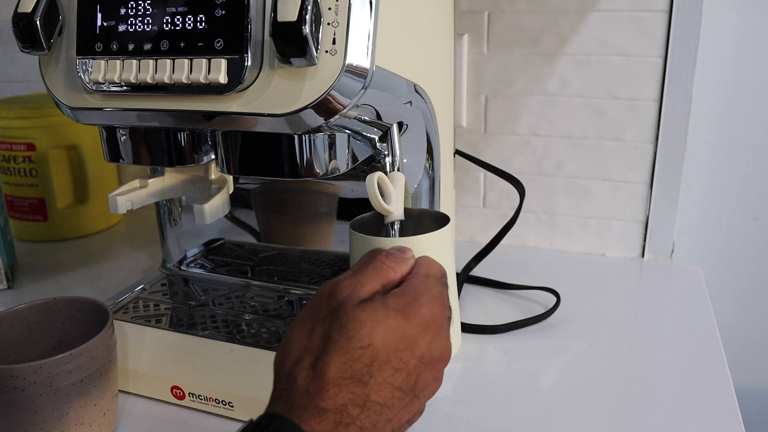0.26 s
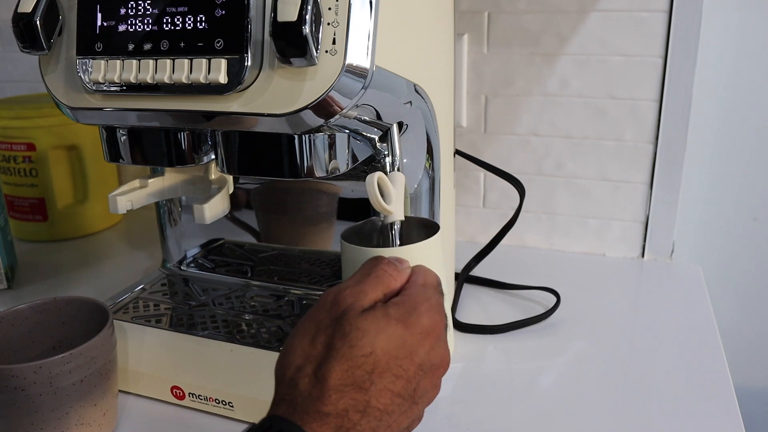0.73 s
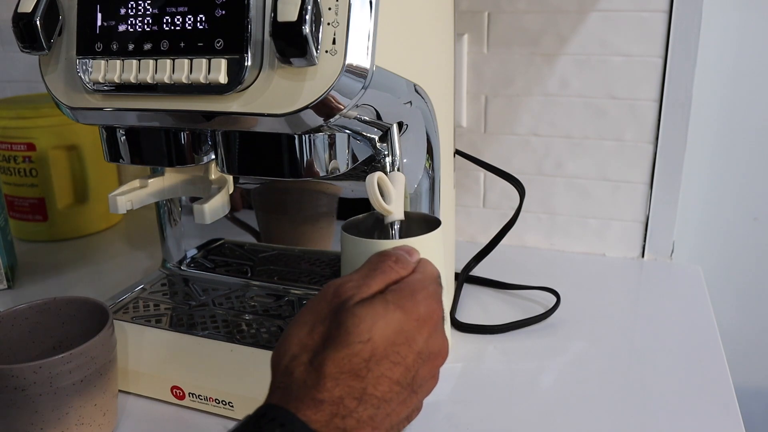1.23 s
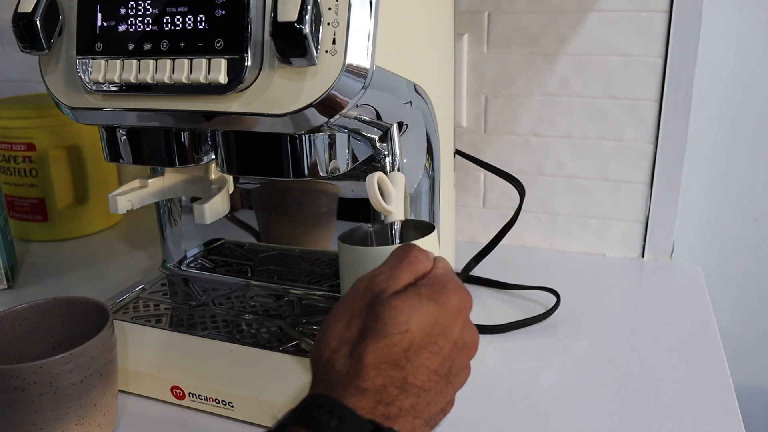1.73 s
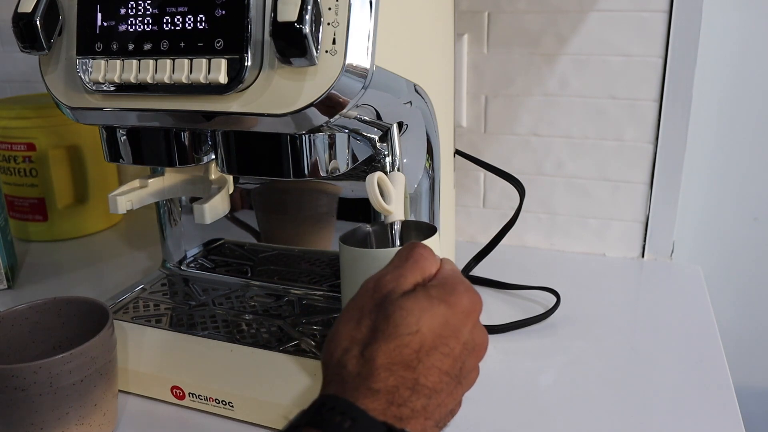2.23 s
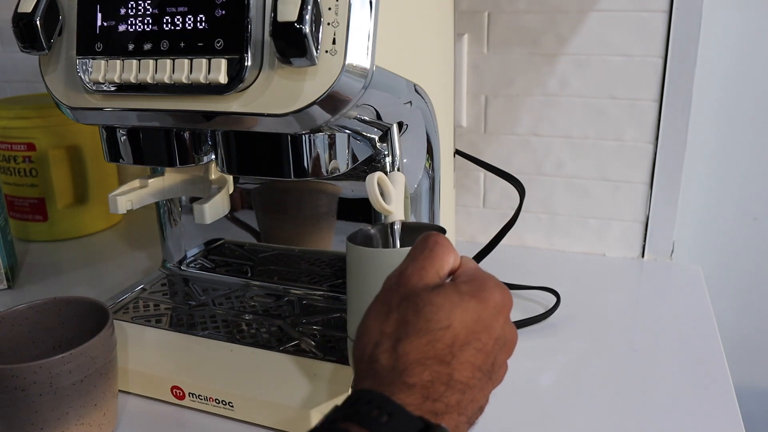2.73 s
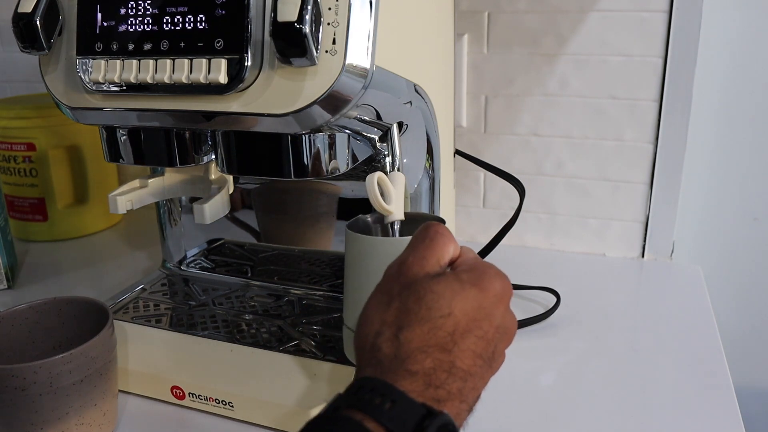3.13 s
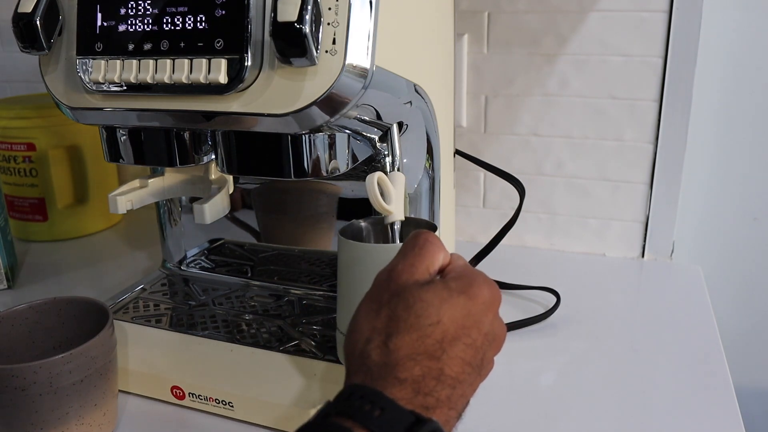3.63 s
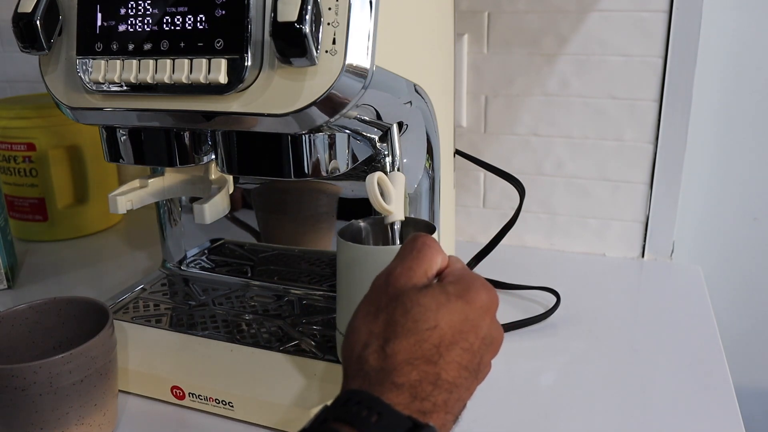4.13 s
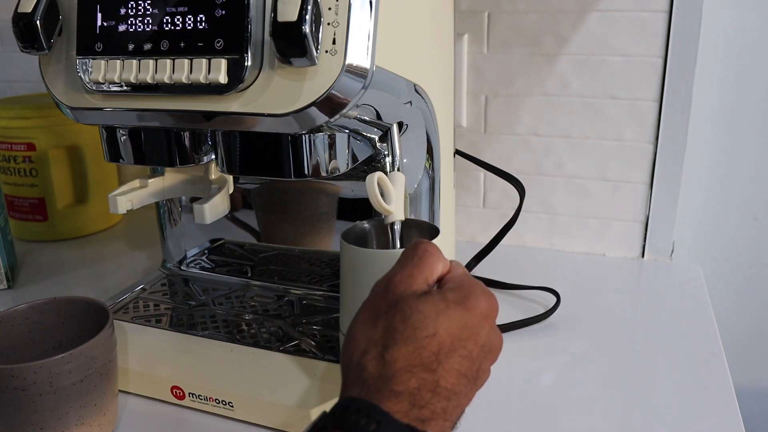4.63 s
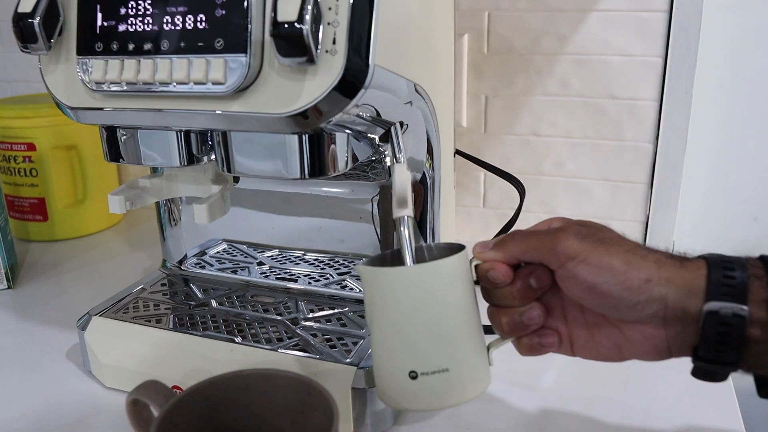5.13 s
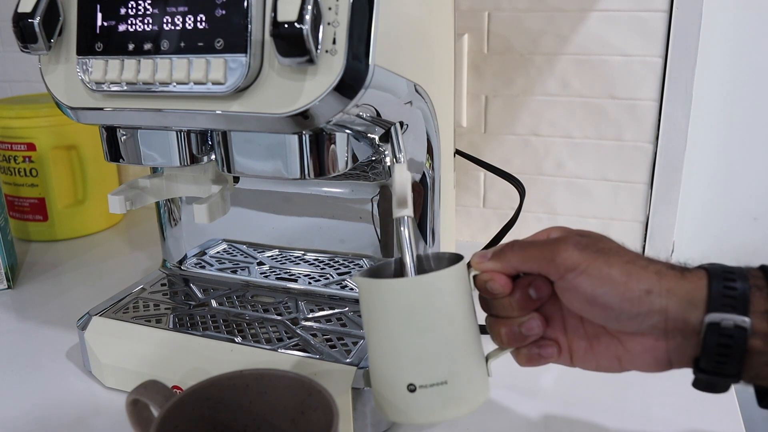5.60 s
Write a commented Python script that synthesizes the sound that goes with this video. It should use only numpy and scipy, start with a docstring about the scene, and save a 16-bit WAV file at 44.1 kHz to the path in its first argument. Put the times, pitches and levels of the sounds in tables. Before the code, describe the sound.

Close up in a kitchen, a steam jet sputters and hisses in milk inside a steel pitcher, with a hopping squeal. A high screech grows steady, then turns ragged and lower. At about five seconds it cuts abruptly to a soft hiss, with quick metallic knocks and a brief rattling scrape against the wand. The same in both channels.

```python
"""A steam wand in milk inside a steel pitcher, heard close in a kitchen, the same in both channels.
First noise bands sputter and hiss, grains ring wall and air, and a low squeal hops in pitch.
Then the jet screeches: tones of wandering strength and phase, with rough overtones, and spits of noise.
At 5.07 s the scene cuts from the jet to soft coloured noise; chattering contacts knock the pitcher on the wand.
Last, slip-driven grains and noise rattle and scrape along it. Rumble and thrum lie below, late a faint hoot."""
import sys
import numpy as np
from scipy import signal
from scipy.fft import rfft, irfft, next_fast_len
from scipy.io import wavfile

SR = 44100
rng = np.random.default_rng(int(sys.argv[2]) if len(sys.argv) > 2 else 0)


def bounce(signal):
    """Save signal as a 16-bit WAV file at the path given by the first command-line argument."""
    frames = np.transpose(np.atleast_2d(signal))
    limited = np.clip(frames, -1, 1)
    pcm = np.round(limited * 32767).astype(np.int16)
    wavfile.write(sys.argv[1], SR, pcm)


N = 258470

# Levels are before gusts, echoes and mix gain. Pairs are for a (ragged, steady) jet.
# Jet screech. Each row: time in seconds, pitch in Hz, level in dB, steadiness 0-1, octave level in dB.
SCREECH = [(.25, 4770, -50, 0.28, -50), (.46, 4805, -31.5, .4, -44), (.78, 4760, -25, .4, -47),
           (.86, 5000, -30, .4, -45), (1.04, 4960, -27, 0.29, -34), (1.07, 4650, -24, .0, -39),
           (1.5, 4790, -22.5, 0.09, -34), (1.66, 4900, -23, .4, -30), (1.9, 5089, -24, 0.67, -38),
           (2.25, 5113, -21.5, 0.93, -32), (2.96, 5137, -22.5, 0.96, -33), (3.2, 5037, -22, 0.96, -31),
           (3.5, 4945, -23, 0.93, -26), (3.86, 4900, -28, .8, -32), (4.02, 4800, -29, .5, -36),
           (4.12, 4470, -25.5, .2, -32), (4.38, 4540, -30.5, .15, -36), (4.6, 4490, -28, .2, -34),
           (5.07, 4370, -30.5, .2, -35)]
# Overtones besides the octave. Each row: multiple of the pitch, relative level in dB.
OVERTONES = [(1.5, 2), (2.5, 2), (3, -2)]
# Lower squeal of the steam pocket, later near half the pitch. Each row: time in seconds, pitch in Hz, level in dB.
SQUEAL = [(0, 2880, -25.5), (.08, 2850, -24.5), (.15, 2450, -28.5), (.3, 2370, -19), (.42, 2150, -26.5),
          (.48, 3200, -42), (.7, 3300, -21), (.85, 3200, -35), (.87, 2900, -25), (1.16, 2680, -26.5),
          (1.5, 2703, -25.5), (1.95, 2781, -28), (2.05, 2561, -31.5), (2.3, 2643, -27), (2.95, 2625, -26.5),
          (3.22, 2520, -27.5), (3.75, 2420, -31), (4.05, 2373, -32), (4.4, 2285, -41), (5.07, 2203, -48)]
SCREECH_WANDER_PER_S, SQUEAL_WANDER_PER_S = (290, 60), (300, 48)
OVERTONES_DB, SKIRT_DB = (-22, -14), (-6, -11)   # against the screech
# Pitcher wall modes. Each row: frequency in Hz, width in Hz, relative level in dB.
WALL_MODES = [(2920, 35, 6), (3360, 49, -4), (3740, 90, -9), (4150, 33, 2.5), (4437, 56, -14.5),
              (4650, 12.2, -5), (4900, 9.6, -12)]

# Steam in the milk. Each row: time in seconds, churning in dB, wall ringing in dB, air column in dB.
STEAM = [(0, -26, -36, -26.5), (.3, -26.5, -29, -23.5), (.45, -24, -27.5, -30), (.6, -23.5, -29, -29.5),
         (.76, -24, -26.5, -42), (1.15, -32, -26, -49.5), (1.35, -37, -33, -43.5), (1.9, -37, -41, -51.5),
         (3.3, -44.5, -45, -46), (3.8, -47, -39, -46.5), (4.15, -37, -28, -44), (4.6, -33.5, -34, -45),
         (4.9, -30, -37, -40), (5.07, -33.5, -32, -39)]
# Sputter spectrum. Each row: frequency in Hz, relative density in dB per Hz.
SPUTTER_SPECTRUM = [(410, -62), (700, -28), (926, -1.5), (1180, -17), (1410, -4.5), (2330, 3), (3780, -4),
                    (3960, -36), (4760, 3), (6000, -5.5), (7000, -7), (9100, -103), (15400, -120)]
# Jet hiss spectrum. Each row: frequency in Hz, relative density in dB per Hz.
HISS_SPECTRUM = [(900, -43.5), (1500, -21.5), (2250, -12.5), (2900, -6), (3200, -17), (3950, -16),
                 (4500, -7), (5300, -8.5), (5900, -22), (6600, -15), (8400, -11.5), (10500, -10),
                 (13800, -17.5), (16000, -12)]
# Jet hiss. Each row: time in seconds, level in dB, top treble against the rest in dB.
HISS_LEVEL = [(0, -28.5, 3), (.5, -25.5, -3), (.9, -28.5, -2), (1.55, -27.5, 0.5), (1.75, -28.5, 0.5),
              (2.8, -31, 0.5), (3.6, -26.5, 0.5), (3.85, -24, -1), (4.2, -22.5, -3), (5.07, -27, -5)]
TOP_TREBLE_HZ = 12000
GAP_HZ, GAP_WIDTH_HZ, GAP_DEPTH = 5950, 1380, (.1, 0.7)   # quiet gap in the hiss above the pitch
AIR_COLUMN_HZ, AIR_COLUMN_WIDTHS_HZ = 932, (60, 156)   # two resonances in series
# Air overtone modes. Each row: frequency in Hz, width in Hz, relative level in dB.
AIR_OVERTONE_MODES = [(1500, 51, 1.5), (1276, 150, -4), (1840, 400, -11.5)]
AIR_OVERTONE_DB, AIR_OVERTONE_DB_PER_S = -6, 3   # against the air column; it gains as the froth rises
# Spits of steam in the treble. Each row: time in seconds, peak gain in dB ahead of the band-pass.
SPITS = [(.54, -19), (.725, -23), (1.195, -26), (1.29, -31), (1.56, -17), (3.815, -18)]
SPIT_S, SPIT_BAND_HZ = .009, (7000, 13000)

CUT_S, CUT_FADE_S = 5.072, 0.0082
# Soft hiss spectrum. Each row: frequency in Hz, relative density in dB per Hz.
SOFT_HISS_SPECTRUM = [(400, -38), (600, -38), (1000, -22), (1250, -17), (1800, -21), (2350, -22),
                      (2550, -7.5), (3000, -7.5), (3270, -1.5), (3600, -11.5), (4300, -16.5), (5100, -9.5),
                      (7700, -16), (11000, -11.5), (13500, -23), (16000, -13)]
SOFT_HISS_DB, SOFT_HISS_DB_PER_S = -29, -3.5

# Knocks. Each row: time in seconds, peak in dB, pitch in Hz, length in seconds.
KNOCKS = [(5.1406, -20.5, 3080, 0.012), (5.2972, -6, 3470, 0.01), (5.304, -7.5, 3050, 0.014),
          (5.319, -7.5, 1990, 0.007), (5.3274, -16, 2050, 0.0094), (5.394, -13.5, 3480, 0.015),
          (5.396, -17, 2270, 0.0072), (5.444, -24, 3260, 0.0086), (5.669, -12, 1760, 0.0076),
          (5.753, -12, 3166, 0.014)]
# Pitcher modes when knocked. Each row: frequency in Hz, width in Hz, relative level in dB.
KNOCK_MODES = [(1387, 105, 1), (1670, 220, 2), (2645, 97, -1.5), (3110, 93, -27.5), (3770, 81, -21),
               (4500, 200, -14.5), (4930, 170, -11), (6600, 270, -31)]
# Drag along the wand. Each row: time in seconds, rattle in dB, thud in dB, scrape in dB.
DRAG = [(5.655, -84, -58, -42.5), (5.669, -22, -53, -16.5), (5.767, -32, -57, -21),
        (5.805, -21.5, -29.5, -13.5), (5.843, -23, -31, -16.5), (5.86, -22, -44, -31)]
# Rattle modes. Each row: frequency in Hz, width in Hz, relative level in dB.
RATTLE_MODES = [(1383, 135, 3.5), (1772, 250, -7.5), (1000, 70, -16), (6500, 220, -17)]
# Thud modes. Each row: frequency in Hz, width in Hz, relative level in dB.
THUD_MODES = [(280, 50, 3.5), (466, 105, -8)]
# Scrape spectrum. Each row: frequency in Hz, relative density in dB per Hz.
SCRAPE_SPECTRUM = [(1180, -42), (2000, -11), (2640, -39), (3090, -11), (5390, -7), (6250, -1.5),
                   (6940, -16.5), (9660, -2), (14900, -5.5), (16000, 3.5)]

# Kitchen rumble. One row: floor in dB, first swell in dB, its decay in seconds, second in dB, its decay in seconds.
RUMBLE = (-68.5, -44, .16, -50.5, 1)
# Rumble spectrum. Each row: frequency in Hz, relative density in dB per Hz.
RUMBLE_SPECTRUM = [(12, -43), (20, -21.5), (54, -7), (136, -10.5), (206, -2), (263, -8), (387, -5),
                   (438, -1), (625, -11.5), (800, -7.5), (1040, -37.5), (1760, -120)]
# Machine thrum. One row: floor in dB, first swell in dB, its decay in seconds, second in dB, its decay in seconds.
THRUM = (-77.5, -43, 0.04, -54, 0.01)
THRUM_HZ, THRUM_WIDTH_HZ = 58, 29
LOW_SWELL_S, LOW_RISE_S = 4.965, 0.021   # second swell of rumble and thrum
# Faint low hoot. Each row: time in seconds, level in dB.
HOOT = [(5.36, -71), (5.444, -58.5), (5.758, -48), (5.8, -41)]
HOOT_HZ = 458

ECHO_T60_S, ECHO_DB = 0.051, -4   # off the machine and counter
KITCHEN_T60_S, KITCHEN_DB = 0.78, -9.5
CUTOFF_HZ = 15750


def screech(gust):
    """An unsteady jet tone with overtones that blur the more the higher they lie, over a lower squeal."""
    hz, top_db, steady, octave_db = in_time(SCREECH)
    squeal_hz, squeal_db = in_time(SQUEAL)
    top_per_s = between(SCREECH_WANDER_PER_S, steady)
    squeal_per_s = between(SQUEAL_WANDER_PER_S, steady)
    hz = hz + 25 * drift(7.73)

    high = np.zeros(N)
    for k, db in OVERTONES:
        high += from_db(db + 1.33 * drift(11.0)) * blurred_tone(k * hz, 1.5 * k * top_per_s)
    high *= from_db(top_db + between(OVERTONES_DB, steady))
    octave = from_db(octave_db + 1.5 * drift(5.5)) * blurred_tone(2 * hz, 2.6 * top_per_s)

    tone = from_db(top_db + 1.0 * drift(3.9)) * blurred_tone(hz, top_per_s)
    squeal = from_db(squeal_db) * blurred_tone(squeal_hz, squeal_per_s)
    skirt_db = top_db + between(SKIRT_DB, steady)
    skirt = from_db(skirt_db) * blurred_tone(.92 * hz, np.full(N, 330.))   # breathy, under the pitch
    low = tone + squeal + skirt
    low = low + from_db(-0.5) * body(low, WALL_MODES)   # the wall rings along
    return (low + octave + high) * from_db(0.46 * gust)


def steam(gust):
    """Collapsing bubbles sputter and the jet hisses as noise; random grains ring the wall and the air."""
    churn_db, wall_db, air_db = in_time(STEAM)
    hiss_db, treble_db = in_time(HISS_LEVEL)
    steady = in_time(SCREECH)[2]

    sputter = from_db(churn_db) * coloured(SPUTTER_SPECTRUM, 1.0, 1.0 * gust, 5.7, count=12)
    hiss = from_db(hiss_db) * coloured(HISS_SPECTRUM, 3.0, 0.68 * gust, 7.6, count=26)
    high_pass = signal.butter(2, TOP_TREBLE_HZ, "high", fs=SR, output="sos")
    treble = signal.sosfiltfilt(high_pass, hiss)
    noise = sputter + hiss + (from_db(treble_db) - 1) * treble
    noise = noise - between(GAP_DEPTH, steady) * resonate(noise, GAP_HZ, GAP_WIDTH_HZ)

    wall = from_db(wall_db + 1.6 * drift(3.4)) * rms_one(body(grains(4000, 1.2), WALL_MODES))
    air = grains(3000, 2.9)
    for width_hz in AIR_COLUMN_WIDTHS_HZ:
        air = resonate(air, AIR_COLUMN_HZ, width_hz)
    overtone = resonate(body(grains(3000, 1.6), AIR_OVERTONE_MODES), 1530, 520)
    overtone_db = air_db + AIR_OVERTONE_DB + AIR_OVERTONE_DB_PER_S * np.arange(N) / SR
    air_sound = from_db(air_db) * rms_one(air) + from_db(overtone_db) * rms_one(overtone)
    return noise + spits() + wall + air_sound


def spits():
    """Short bright bursts: band-passed noise under Gaussian envelopes."""
    t = np.arange(N) / SR
    envelope = sum(from_db(db) * np.exp(-((t - s) / SPIT_S) ** 2) for s, db in SPITS)
    band_pass = signal.butter(3, SPIT_BAND_HZ, "band", fs=SR, output="sos")
    return envelope * signal.sosfilt(band_pass, rng.standard_normal(N))


def soft_hiss(gust, since_cut_s):
    """Soft flickering coloured noise whose level falls steadily after the cut."""
    level_db = SOFT_HISS_DB + SOFT_HISS_DB_PER_S * np.maximum(since_cut_s, 0)
    return from_db(level_db) * coloured(SOFT_HISS_SPECTRUM, 2.1, 0.25 * gust, 23.0, count=20)


def knocks():
    """Each knock is a short chatter of contacts into the damped pitcher, tinted at a pitch of its own."""
    t, out = np.arange(N) / SR, np.zeros(N)
    for s, peak_db, hz, length_s in KNOCKS:
        at = slice(round(s * SR) - 90, round(s * SR) + 3000)
        since = np.maximum(t[at] - s + 0.002, 0) / max(length_s, .002)   # in lengths, from 2 ms early
        envelope = np.minimum(4 * since, 1) * np.exp(-since ** 2)
        chatter = rng.choice([-1., 1.], len(since)) * envelope
        knock = body(chatter, KNOCK_MODES) + 1.52 * resonate(chatter, hz, 286)
        out[at] += from_db(peak_db) * knock / np.abs(knock).max()
    return out


def drag():
    """Uneven slips scale grains into rattle and thud modes, and a coloured scrape noise."""
    rattle_db, thud_db, scrape_db = in_time(DRAG)
    slips = from_db(2.1 * drift(78))
    rattle = from_db(rattle_db) * rms_one(body(slips * grains(4000, 3.5), RATTLE_MODES))
    thud = from_db(thud_db) * rms_one(body(slips * grains(1200, 2.7), THUD_MODES))
    scrape = from_db(scrape_db) * slips * coloured(SCRAPE_SPECTRUM, 0.43, 0, 12, count=10)
    started = np.arange(N) > DRAG[0][0] * SR
    return started * (rattle + thud + scrape)


def hoot():
    """A faint low tone, slowly wandering in strength and phase."""
    started = np.arange(N) > HOOT[0][0] * SR
    return started * from_db(in_time(HOOT)[0]) * blurred_tone(np.full(N, HOOT_HZ), np.full(N, 12.))


def rumble():
    """Kitchen rumble: low coloured noise with two swells."""
    return swells(*RUMBLE) * coloured(RUMBLE_SPECTRUM, 0.38, 0, 6.4, count=5)


def thrum():
    """Low thrum of the machine: noise through one broad resonance, with two swells."""
    return swells(*THRUM) * rms_one(resonate(rng.standard_normal(N), THRUM_HZ, THRUM_WIDTH_HZ))


def swells(floor_db, first_db, first_s, second_db, second_s):
    """Gain of a floor with two dying swells, at the start and at LOW_SWELL_S."""
    t = np.arange(N) / SR
    since = np.maximum(t - LOW_SWELL_S, 0)
    first = from_db(first_db) * np.exp(-t / first_s)
    second = from_db(second_db) * np.minimum(since / LOW_RISE_S, 1) * np.exp(-since / second_s)
    return from_db(floor_db) + first + second


def echoes(x, t60_s, level_db):
    """Dense reflections: a dying noise as impulse response."""
    t = np.arange(SR // 2) / SR
    tail = rng.standard_normal(len(t)) * from_db(-60 * t / t60_s)
    high_pass = signal.butter(2, 1100, "high", fs=SR, output="sos")   # reflections leave the low tones even
    tail = signal.sosfilt(high_pass, tail)
    tail /= np.sqrt(np.sum(tail ** 2))
    return x + from_db(level_db) * signal.fftconvolve(x, tail)[:N]


def blurred_tone(hz, per_s):
    """A tone whose strength and phase wander by chance, per_s (10 to 900) times a second; rms about 1."""
    phase = 2 * np.pi * np.cumsum(hz) / SR
    at = np.cumsum(np.clip(per_s, 10, 900)) / 900   # read a fast drift at a varying speed
    a, b = (np.interp(at, np.arange(N), drift(900)) for _ in range(2))
    return a * np.cos(phase) + b * np.sin(phase)


def coloured(spectrum, patchy_db, gust, per_s, count):
    """Noise of the given spectrum in count bands that flicker per_s times a second, partly together; rms 1."""
    size, points = next_fast_len(N), np.array(spectrum)
    hz = np.maximum(np.arange(size // 2 + 1) * SR / size, 1)
    shape = from_db(np.interp(np.log(hz), np.log(points[:, 0]), points[:, 1]))
    bins = rfft(rng.standard_normal(size)) * shape
    place = (count - 1) * np.sqrt(np.interp(hz, points[[0, -1], 0], [0, 1]))   # bands widen upwards
    out = np.zeros(N)
    for band in range(count):
        share = np.clip(1 - np.abs(place - band), 0, 1)
        out += irfft(bins * share, size)[:N] * from_db(patchy_db * (gust + drift(per_s)))
    return rms_one(out)


def grains(per_s, spread_db):
    """Random clicks of uneven size; rms 1."""
    sizes = from_db(spread_db * np.minimum(rng.exponential(1, N), 5)) * rng.choice([-1, 1], N)
    return rms_one(sizes * (rng.random(N) < per_s / SR))


def body(x, modes):
    """Resonances in parallel, signs alternating."""
    return sum((-1) ** k * from_db(db) * resonate(x, hz, width_hz)
               for k, (hz, width_hz, db) in enumerate(modes))


def resonate(x, hz, width_hz):
    """One two-pole resonance, gain about 1 on top."""
    r = np.exp(-np.pi * width_hz / SR)
    poles = [1, -2 * r * np.cos(2 * np.pi * hz / SR), r * r]
    return signal.lfilter([(1 - r * r) / 2, 0, (r * r - 1) / 2], poles, x)


def drift(per_s):
    """Slow chance of spread 1, about per_s changes a second: low-passed noise made at SR / 8."""
    r = np.exp(-16 * np.pi * per_s / SR)
    noise = rng.standard_normal(N // 8 + 8002)
    slow = signal.lfilter([1], [1, -2 * r, r * r], noise)[8000:]   # settled part
    return np.interp(np.arange(N) / 8, np.arange(len(slow)), rms_one(slow))


def between(ragged_steady, steadiness):
    """Value for a jet between ragged (0) and steady (1)."""
    ragged, steady = ragged_steady
    return ragged + (steady - ragged) * np.clip(steadiness, 0, 1)


def in_time(rows):
    """Table columns as sample-rate curves."""
    s, *columns = np.transpose(rows)
    return [np.interp(np.arange(N) / SR, s, c) for c in columns]


def from_db(db):
    """Decibels to gain."""
    return 10 ** (np.asarray(db) / 20)


def rms_one(x):
    """Scale to unit rms."""
    return x / np.sqrt(np.mean(np.abs(x) ** 2) + 1e-20)


def scene():
    """Steam until the cut, then soft hiss, knocks and drag, all over the rumble."""
    gust = 0.38 * drift(4.4) + 0.44 * drift(21.0)
    since_cut_s = np.arange(N) / SR - CUT_S
    before_cut = np.clip(-since_cut_s / CUT_FADE_S, 0, 1)
    jet = from_db(-1.5) * echoes(screech(gust) + steam(gust), ECHO_T60_S, ECHO_DB)
    after_cut = echoes(soft_hiss(gust, since_cut_s), ECHO_T60_S, ECHO_DB)
    blows = echoes(knocks() + drag(), KITCHEN_T60_S, KITCHEN_DB)
    mono = before_cut * jet + (1 - before_cut) * after_cut + blows + rumble() + thrum() + hoot()
    return np.array([mono, mono])


def record(dry):
    """A steep low-pass cuts the top."""
    return signal.sosfilt(signal.ellip(14, .3, 70, CUTOFF_HZ, fs=SR, output="sos"), dry)


dry = scene()
out = record(dry)
bounce(out)
```